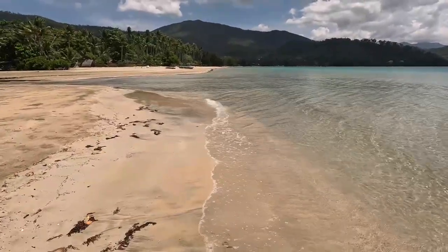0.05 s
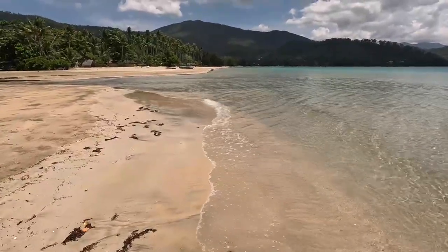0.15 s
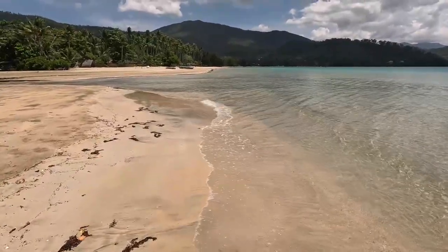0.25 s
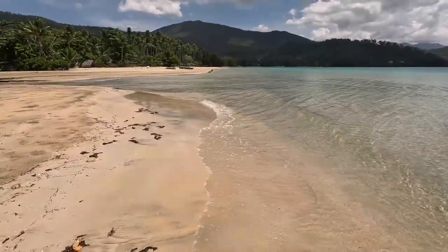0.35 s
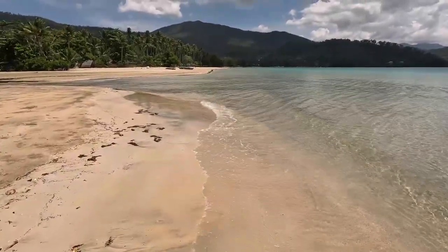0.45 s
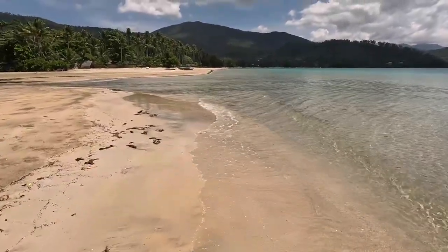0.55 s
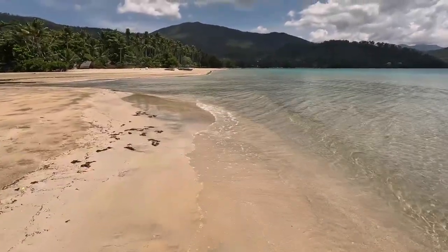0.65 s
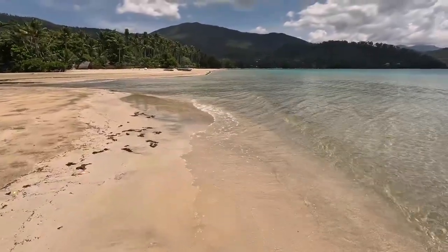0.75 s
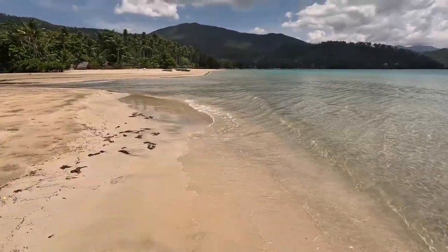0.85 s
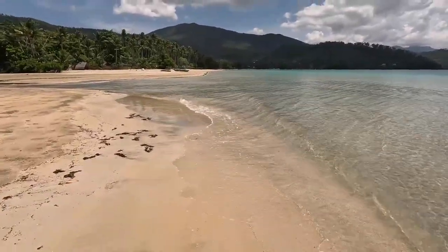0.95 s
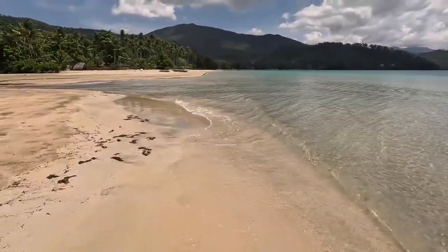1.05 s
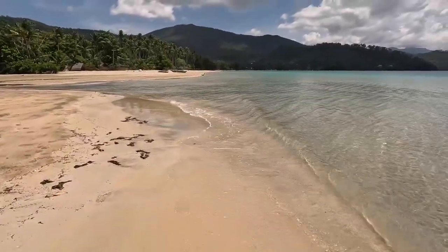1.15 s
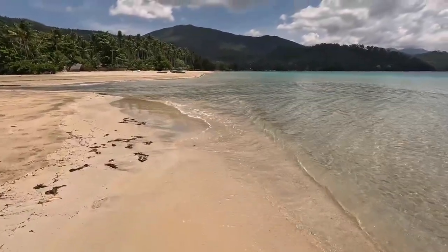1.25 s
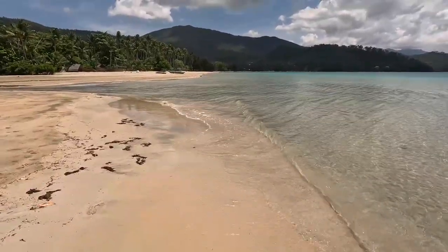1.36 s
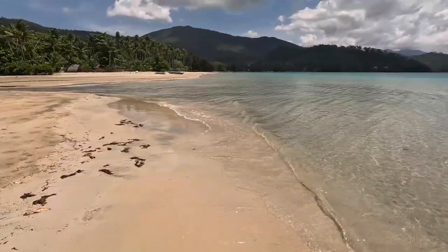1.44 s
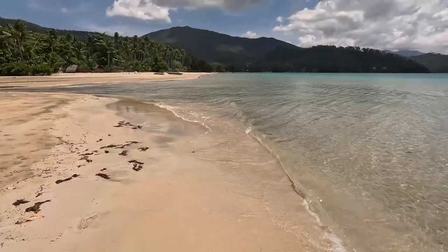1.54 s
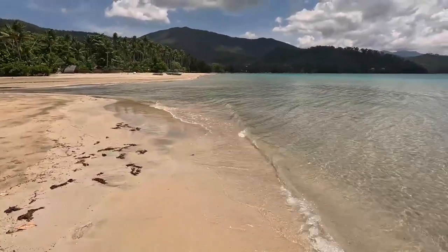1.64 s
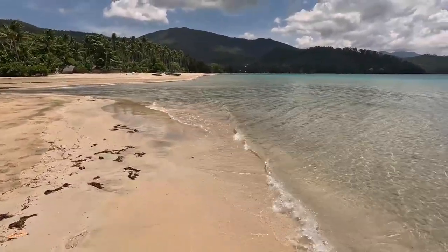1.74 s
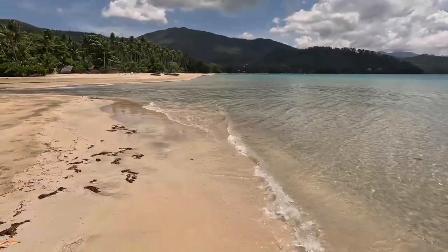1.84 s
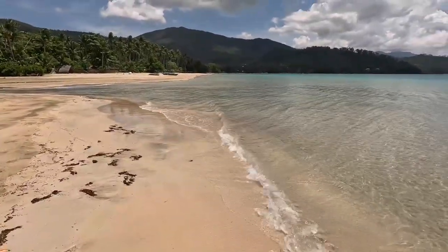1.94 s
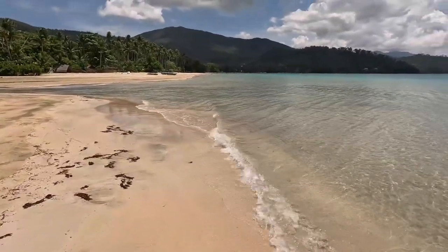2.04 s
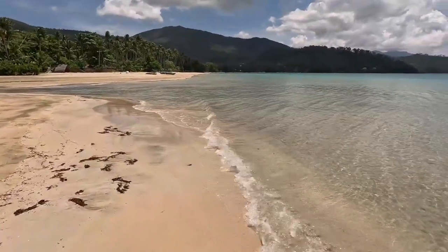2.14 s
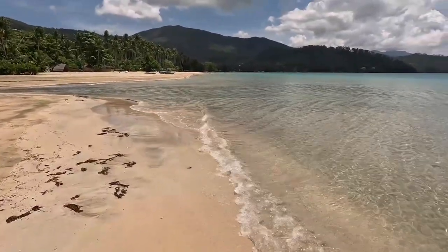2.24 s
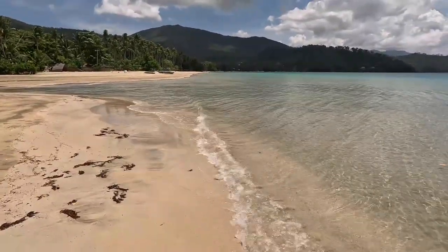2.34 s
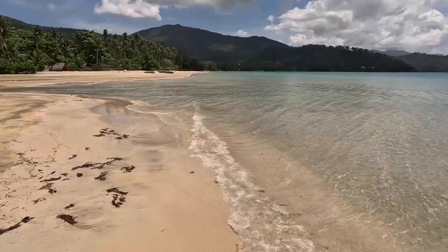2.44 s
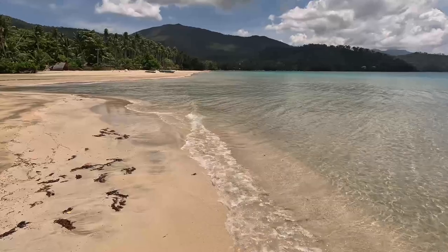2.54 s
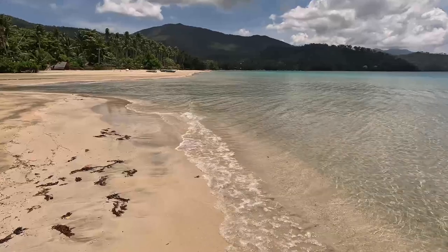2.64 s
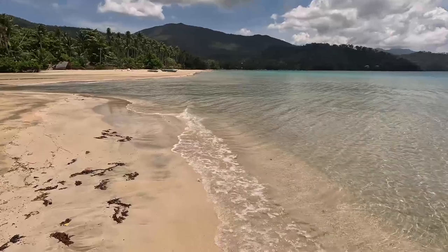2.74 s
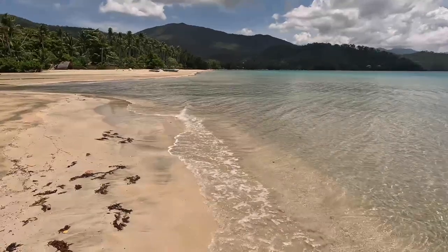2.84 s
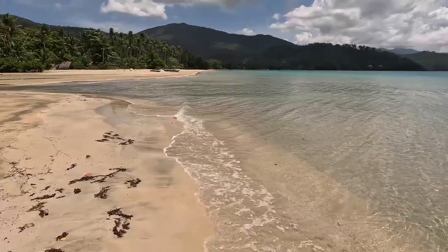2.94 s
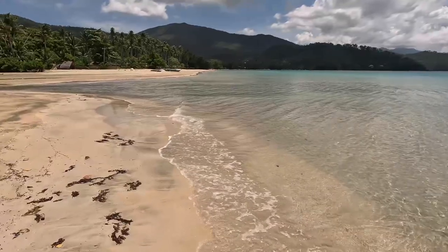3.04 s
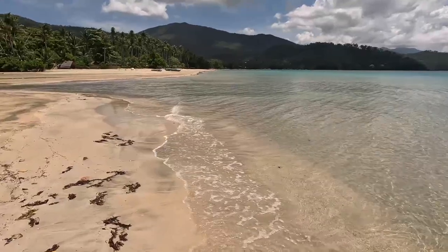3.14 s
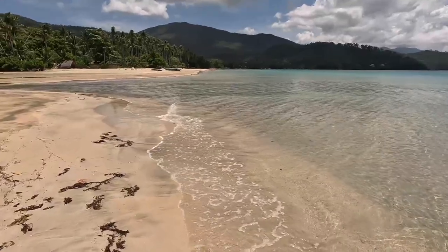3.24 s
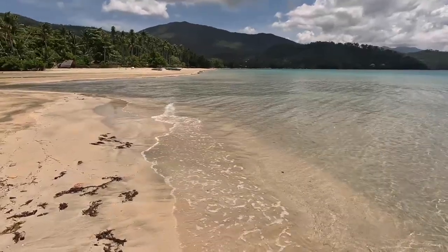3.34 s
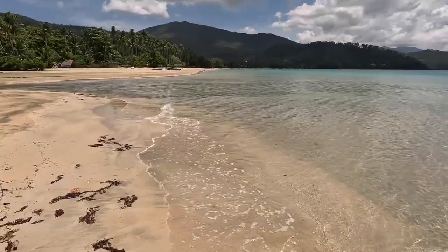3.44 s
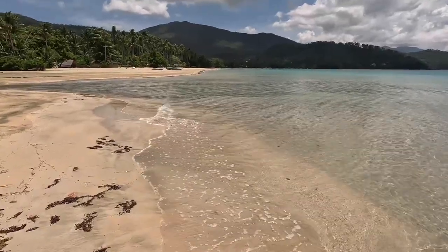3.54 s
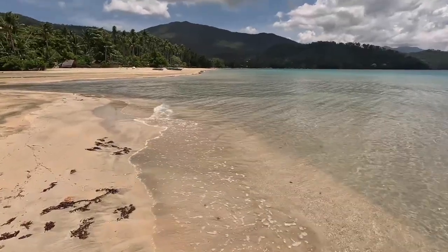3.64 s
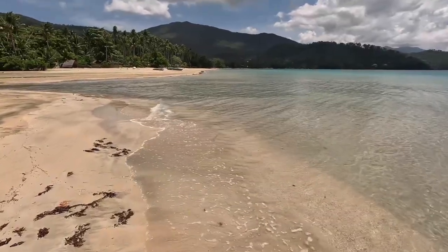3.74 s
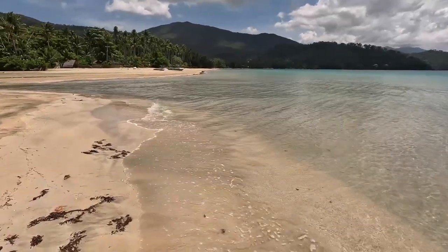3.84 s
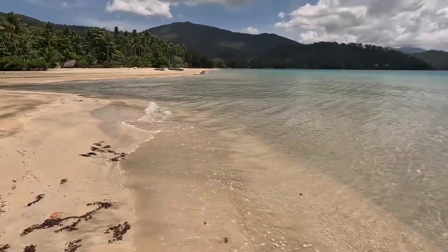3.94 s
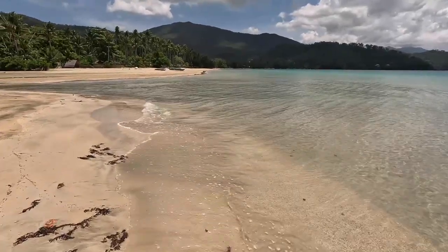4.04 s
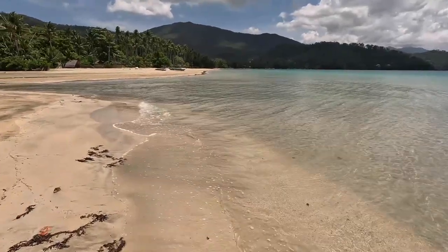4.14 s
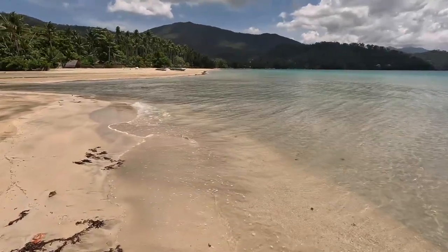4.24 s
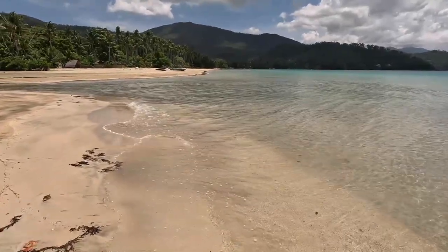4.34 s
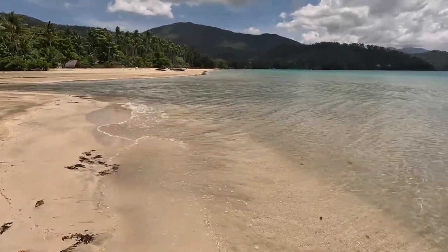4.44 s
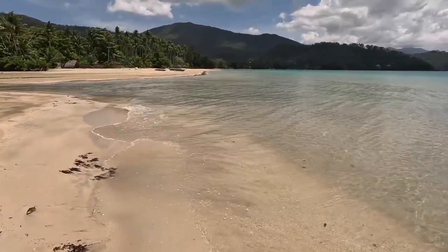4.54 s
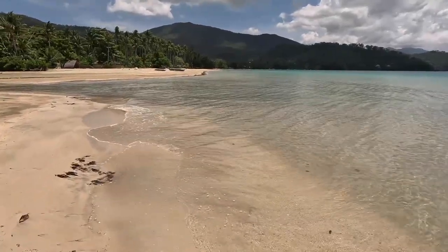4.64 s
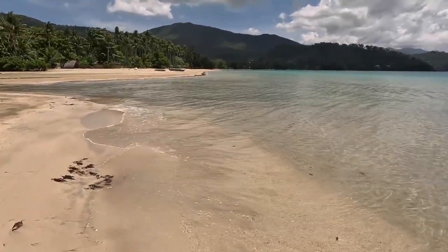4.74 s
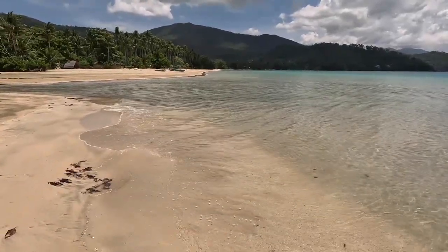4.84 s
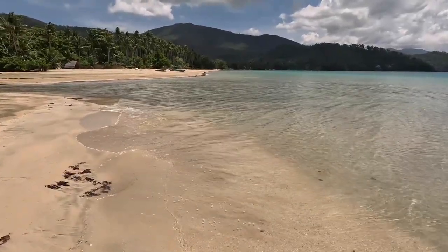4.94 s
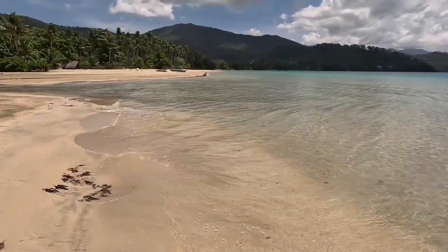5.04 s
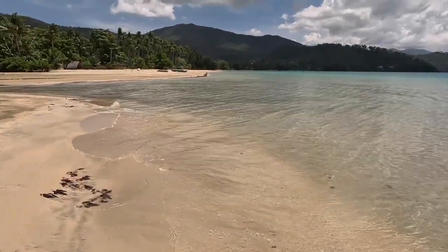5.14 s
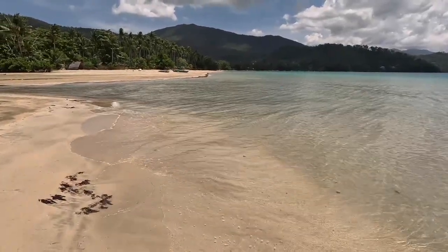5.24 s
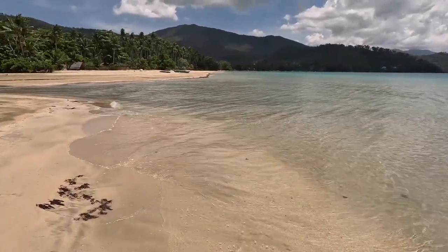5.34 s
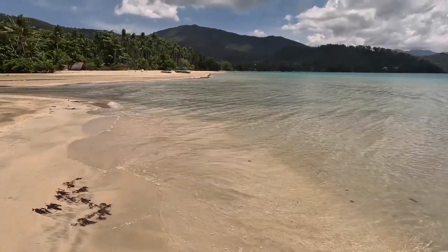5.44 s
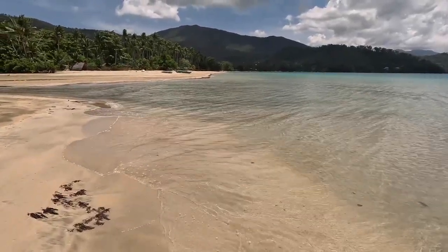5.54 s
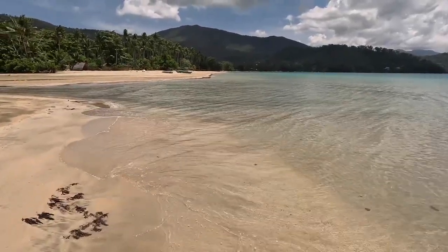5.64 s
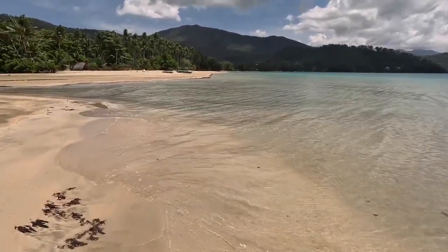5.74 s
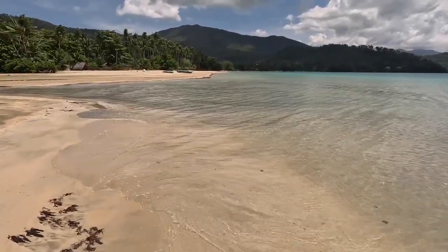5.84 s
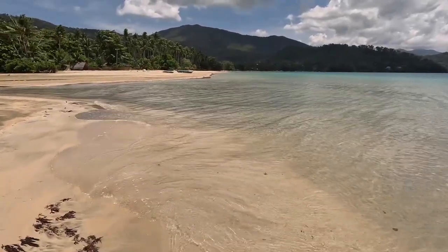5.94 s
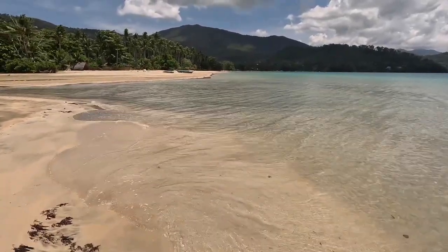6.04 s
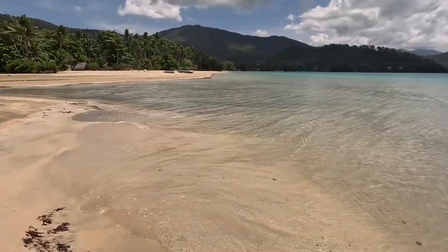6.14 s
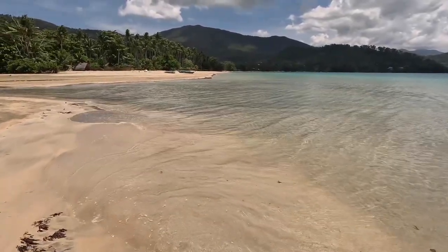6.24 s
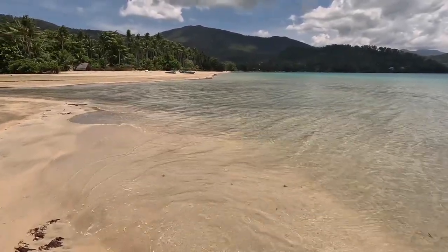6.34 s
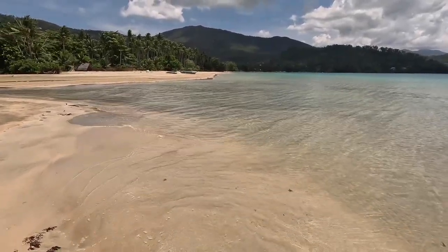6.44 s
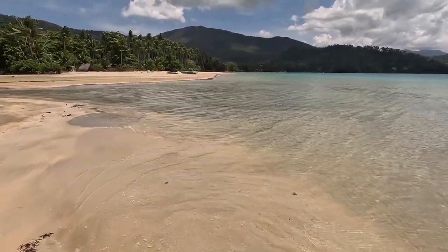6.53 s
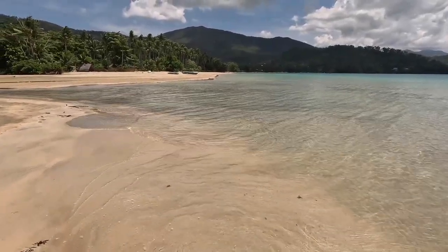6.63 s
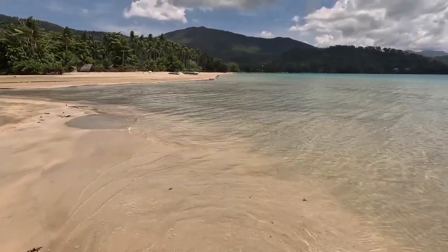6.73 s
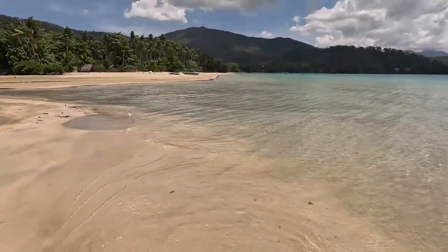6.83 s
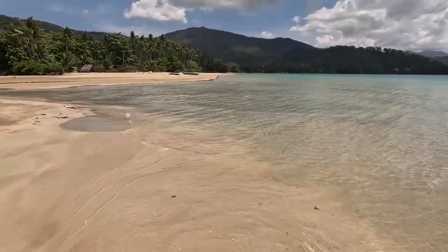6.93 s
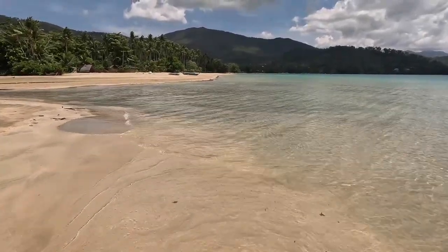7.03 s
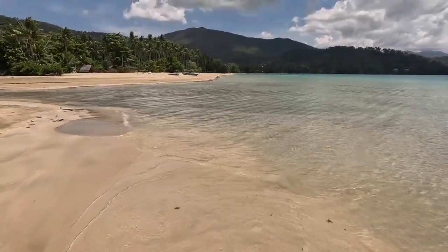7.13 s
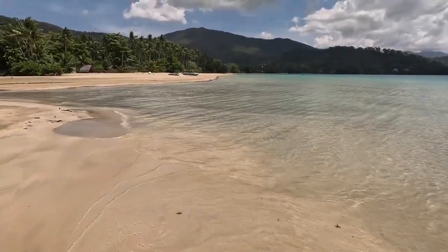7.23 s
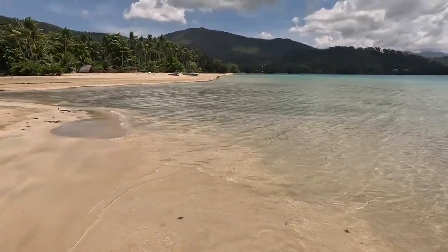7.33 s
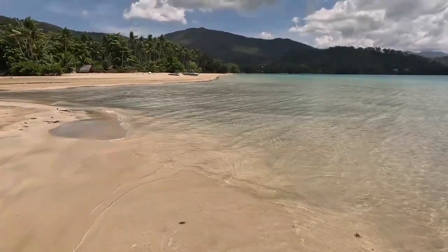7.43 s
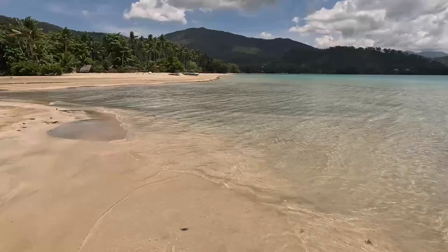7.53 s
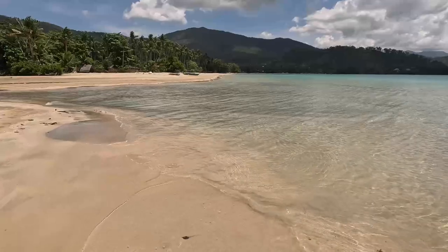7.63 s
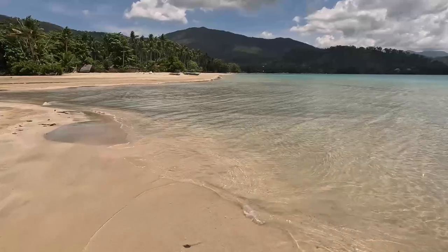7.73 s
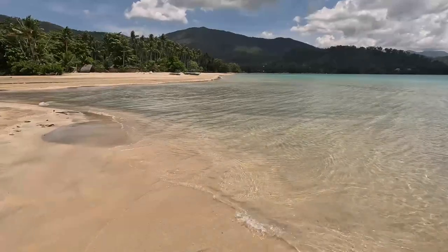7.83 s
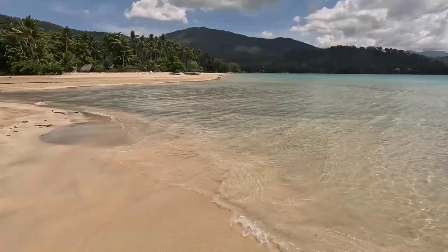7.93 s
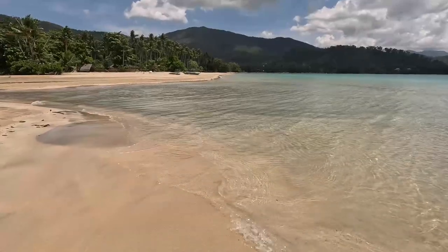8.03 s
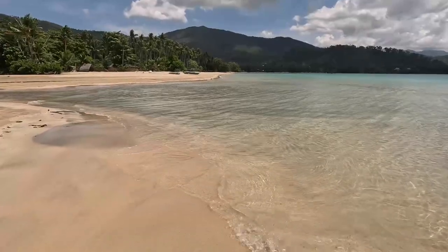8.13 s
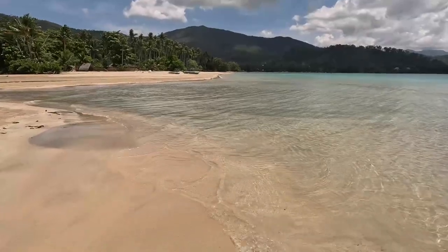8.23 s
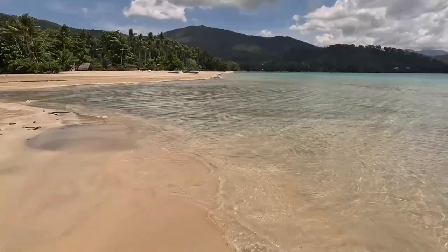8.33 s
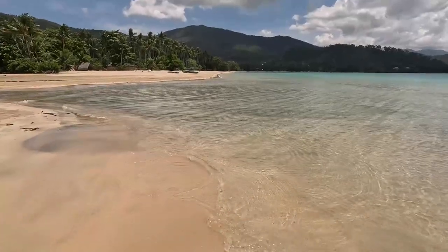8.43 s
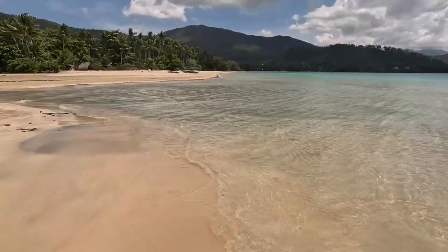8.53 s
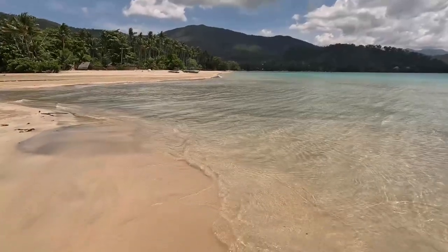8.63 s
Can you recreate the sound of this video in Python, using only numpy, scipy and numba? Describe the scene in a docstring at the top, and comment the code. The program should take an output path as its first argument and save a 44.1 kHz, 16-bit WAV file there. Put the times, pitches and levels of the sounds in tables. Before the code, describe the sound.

A gentle wavelet breaks nearby with gurgling plops and foamy fizz, wind rumbling beneath, before quieter laps and small drips as the breeze fades.

```python
"""Wind rumble and soft small waves come first; then a wavelet curls over close by on a sandy beach.
It fizzes as foam and drains away with little laps; weaker surges follow as the breeze dies down.
The water is made of clouds of ringing bubbles, with single plops, drops, slaps and gurgles.
Part of it also bounces off the wet sand. Wind and a thin hiss are shaped random noise."""
import sys
import numpy as np
from scipy import signal
from scipy.fft import rfft, irfft, next_fast_len
from scipy.io import wavfile
from scipy.ndimage import uniform_filter1d
from numba import njit

SR = 44100
rng = np.random.default_rng(int(sys.argv[2]) if len(sys.argv) > 2 else 0)


def int16_out(signal):
    """Quantize to a 16-bit WAV file."""
    q = np.round(np.clip(np.atleast_2d(signal).T, -1, 1) * 32767)
    wavfile.write(sys.argv[1], SR, q.astype(np.int16))


N = 382788
TIME = np.arange(N) / SR
STEPS = np.arange(N // 100 + 2) * 100 / SR  # a coarser clock for slow changes, in s

# swells of the water sound (breaks, surges, foam bursts and backwash):
# [peak t/s, build-up/s, draining/s, churn level/dB, spray level/dB, fizz level/dB]
SWELLS = [(0.02, 0.12, 0.12, -51.5, -55.5, -70), (0.43, 0.35, 0.49, -43, -50.5, -68),
          (0.63, 0.018, 0.098, -39.5, -49, -78), (0.81, 0.11, 1.2, -40, -46.5, -68),
          (1.18, .1, 0.094, -41, -48.5, -75), (1.35, 0.11, 0.62, -41, -40, -58),
          (1.55, 0.029, 0.026, -28.5, -53.5, -71), (1.605, 0.088, 0.78, -30.5, -35.5, -55),
          (1.61, .03, 0.043, -28.5, -34.3, -60), (1.82, 0.084, 0.12, -30, -39, -62),
          (1.95, .03, 0.15, -31.5, -38.5, -65), (2.29, 0.085, 0.16, -35.5, -38, -67),
          (2.5, .06, 0.25, -43, -47, -79), (2.71, 0.044, .06, -45.5, -51.5, -77),
          (3.1, 0.053, 0.06, -47, -51, -62), (3.39, 0.096, 0.07, -49, -58, -67),
          (3.905, 0.031, 0.036, -64, -50, -74), (4.0, 5.5, 0.64, -52, -66, -74),
          (4.38, 0.18, 0.11, -49.5, -54, -69), (4.505, 0.14, 0.087, -45.5, -53, -70),
          (4.63, .07, 0.095, -51, -61, -74), (5.25, 0.17, 0.2, -48.5, -61, -80),
          (5.64, 0.22, 0.17, -49.5, -63, -82), (7.0, 0.31, 1.1, -58.5, -60, -91),
          (8.06, 0.25, 0.34, -55, -51.5, -68), (8.11, 0.056, 0.028, -45.5, -65, -65),
          (8.28, 0.061, 0.12, -54, -56, -74), (8.66, 0.11, .3, -56.5, -52.5, -66)]
# the far shoreline, always there: [churn level/dB, spray level/dB, fizz level/dB]
SHORE_LEVELS = (-54.5, -60, -74.5)
# the near crest curling over: [t/s, build-up/s, draining/s, level of its big air pockets/dB]
CURLS = [(1.25, 0.29, 0.26, -34.5), (1.69, 0.13, 0.16, -28.5)]
# single air pockets closing in the water: [t/s, pitch f/Hz, tone peak level/dB, length/s, pitch climb/share]
PLOPS = [(0.62, 800, -28, 0.004, 0.21), (.723, 720, -31, 0.0047, 0.19), (0.803, 1346, -28.5, .007, 0.089),
         (0.92, 217, -22, 0.011, .1), (1.2646, 1160, -19.5, 0.003, -0.2), (1.2825, 557, -21, 0.015, -0.23),
         (1.407, 606, -23.5, 0.006, 0.14), (1.5572, 625, -20, 0.0091, -0.13),
         (1.5995, 1290, -18.5, 0.0042, 0.15), (1.622, 183, -16.5, .016, -0.023),
         (1.6625, 420, -17.5, 0.0085, 0.28), (1.6969, 460, -16, 0.0039, 0.21),
         (1.7505, 740, -19, 0.0043, .1), (1.7545, 335, -17, 0.0082, 0.1),
         (1.8597, 850, -18.5, 0.0047, -0.17), (1.97, 254, -18, 0.0087, -0.047),
         (2.276, 800, -19.5, .004, 0.17), (2.3186, 250, -17.5, 0.0052, -0.016),
         (2.785, 756, -34, 0.011, 0.14), (2.982, 672, -33, 0.011, 0.24), (3.388, 700, -35, 0.011, 0.19),
         (3.4921, 173.7, -33.5, 0.024, 0.32), (3.493, 560, -32.5, 0.0055, 0.15),
         (3.5096, 565, -36, 0.0095, 0.38), (3.822, 640, -45, 0.0106, -.1), (3.968, 1540, -42, 0.01, 0.17),
         (4.2656, 750, -36, 0.0034, .1), (4.3346, 720, -34.5, 0.0072, 0.14), (4.359, 750, -39, 0.0076, .1),
         (4.4678, 267, -30, 0.0086, 0.27), (4.4915, 726, -34, .003, .1), (4.4975, 726, -31.5, 0.009, .05),
         (4.6926, 1100, -38, 0.0099, 0.16), (5.0467, 760, -35, 0.0051, .1), (5.062, 950, -45, 0.0054, .25),
         (5.153, 1600, -38, 0.0039, -0.12), (5.1547, 780, -34, 0.008, -0.021),
         (5.1726, 660, -33, 0.0059, -0.27), (5.2476, 290, -30.5, 0.008, 0.021),
         (5.2749, 1670, -39.5, .007, -0.038), (5.298, 750, -33, 0.013, 0.53), (5.321, 1495, -41.5, .01, .2),
         (5.3939, 780, -39.5, 0.0038, .1), (5.588, 610, -40, .02, 0.37), (5.6371, 685, -40, .012, 0.11),
         (5.634, 222, -34.5, 0.013, -0.18), (5.699, 730, -38, 0.0143, 0.43),
         (5.8995, 746, -40.5, 0.0059, 0.14), (5.9331, 754, -44, .015, 0.23), (6.4352, 375, -37, 0.0052, .2),
         (6.973, 670, -38, 0.0082, 0.069), (7.113, 1450, -42, .01, 0.19),
         (7.2739, 600, -31.5, 0.0068, -0.037), (7.845, 1370, -40, .007, 0.062),
         (7.9221, 257, -35, 0.0089, .1), (7.933, 1530, -40, .005, 0.15), (7.9755, 830, -30, 0.004, -0.26),
         (7.997, 330, -38, .009, .1), (8.0105, 706, -29, 0.0083, 0.0041), (8.0216, 930, -29, 0.0041, .1),
         (8.0336, 750, -32, 0.0043, -0.018), (8.0505, 850, -29.5, 0.0075, 0.3),
         (8.07, 253, -36, 0.0079, 0.025), (8.0757, 730, -31.5, 0.0032, 0.057),
         (8.088, 1500, -33, 0.0043, 0.16), (8.0954, 890, -21.5, 0.00323, 0.053),
         (8.103, 970, -30, 0.0075, 0.13), (8.1155, 2950, -36, .003, 0.045),
         (8.1161, 2300, -37, 0.0058, 0.17), (8.1205, 1030, -30, 0.0043, .1),
         (8.3059, 1780, -36, 0.0058, 0.22), (8.3343, 940, -32, 0.0046, 0.047),
         (8.336, 340, -38, 0.01, 0.17)]
# drops landing and small bubbles bursting nearby: [t/s, pitch f/Hz, tone peak level/dB, length/s]
DROPS = [(1.013, 9500, -47, .0006), (1.026, 9000, -47, .0006), (1.2936, 2340, -17.5, 0.00057),
         (1.2938, 4700, -25, .0006), (1.3637, 1800, -17.5, 0.0013), (1.3629, 4530, -23, 0.0004),
         (2.229, 3280, -24.5, .003), (3.371, 2950, -41, .002), (3.382, 4350, -41, 0.0014),
         (3.396, 2550, -38, .0025), (3.458, 3590, -44, .0015), (3.704, 4400, -44, 0.0011),
         (3.712, 2800, -38, .0016), (3.719, 4370, -40, 0.0011), (3.928, 3810, -41, 0.001),
         (3.91, 3450, -34.5, 0.0015), (3.923, 2980, -43, 0.00196), (4.309, 4060, -31, 0.00044),
         (4.571, 5400, -43, 0.0012), (7.03, 6080, -42, .0003), (7.1374, 6000, -38.5, .0007),
         (7.1575, 7000, -48, .0002), (7.5102, 4440, -36.5, 0.00025), (7.593, 7450, -38, 0.00049),
         (7.622, 4600, -25.5, 0.00016), (7.813, 3830, -36, 0.00043), (7.8819, 3850, -30.5, 0.001),
         (8.074, 6200, -38, .0003), (8.1158, 5600, -36, 0.0013), (8.2016, 4960, -23, 0.00053),
         (8.21, 4130, -28, 0.00072), (8.228, 5310, -38, .0008), (8.2626, 4660, -38, .0005),
         (8.451, 2980, -39, .002), (8.602, 4310, -40, 0.00069), (8.617, 5100, -35, 0.00047)]
# the lip of a crest slapping water or sand: [t/s, level/dB, decay/s]
SLAPS = [(0.619, -40, 0.012), (0.795, -36, 0.047), (1.292, -26, 0.0025), (1.3624, -26.5, 0.008),
         (1.588, -33, .03), (1.75, -34, .02), (3.384, -57, .016), (3.703, -40.5, 0.011),
         (4.309, -42, 0.0044), (5.041, -48, .006), (5.151, -41, 0.007), (6.733, -48.5, 0.01),
         (8.112, -39, 0.0097), (8.256, -41.5, .014)]
# ripples folding shut: [t/s, length/s, first f/Hz, last f/Hz, rms level/dB]
GURGLES = [(0.819, .07, 340, 420, -42), (1.104, 0.11, 304, 424, -37), (1.17, .09, 630, 1010, -38.5),
           (1.602, 0.19, 328, 423, -43), (2.2, 0.19, 810, 830, -35), (3.307, 0.061, 282, 220, -45),
           (4.65, 0.037, 497, 1160, -46), (5.056, 0.11, 248, 420, -47), (5.186, 0.052, 336, 300, -48),
           (5.527, 0.11, 204, 270, -50), (5.638, 0.054, 1050, 1600, -58), (6.675, .07, 354, 560, -51),
           (6.732, .06, 670, 960, -48.5), (7.83, 0.24, 263, 307, -49), (7.96, 0.14, 840, 1000, -44.5),
           (8.038, 0.095, 1300, 1650, -48), (8.241, .17, 960, 900, -48.5)]
# separate droplets of the last wavelet: [t/s, level/dB]
PATTER = [(7.4, -100), (7.75, -67), (7.95, -60), (8.1, -60.5), (8.4, -61.5), (8.68, -65.5)]
# delay of the bounce off the wet sand, as the breaking front moves: [t/s, lag/ms]
SAND_LAG = [(0, 1.36), (.7, 1.4), (1.2, 1.75), (1.6, 1.65), (1.9, 1.2), (2.3, 1.22), (3.0, 1.3),
            (3.7, 1.39), (5.3, 1.3), (7.4, 1.4), (8.0, 1.1), (8.68, 1.1)]
# how wide the sound is, opening once the breeze has dropped: [t/s, side against centre level/dB]
WIDTH = [(0, -81), (6.4, -51), (7, -25), (7.7, -20.5), (8.68, -15)]
# the breeze dying down: [t/s, wind level/dB]
BREEZE = [(0, -39.5), (0.35, -33.5), (2.1, -33.5), (2.28, -37.5), (2.7, -36), (3.1, -37), (3.6, -44),
          (4.4, -46.5), (5.5, -51.5), (7, -54.5), (8.68, -66)]
# gusts on top of the breeze: [t/s, half length/s, wind level/dB]
GUSTS = [(0.187, 0.021, -31), (0.362, 0.029, -27), (0.44, 0.015, -25.5), (0.559, 0.054, -26.5),
         (0.72, 0.027, -30), (0.806, 0.02, -28), (0.945, 0.026, -30), (1.497, 0.018, -25),
         (1.608, 0.051, -27), (1.777, 0.03, -28), (1.996, 0.038, -24.5), (2.166, 0.034, -32.5),
         (2.447, .025, -28), (2.591, 0.048, -23.5), (2.802, 0.076, -36), (3.857, 0.024, -38.5),
         (4.082, 0.03, -38), (4.22, 0.033, -38), (4.333, .06, -41), (4.987, 0.13, -45.5),
         (6.046, 0.12, -44), (6.504, 0.15, -49), (6.987, 0.06, -47), (7.58, .03, -50), (8.226, .04, -53)]
# swelling and sinking of the thin hiss: [t/s, level/dB in the left ear]
HISS = [(0, -74), (.4, -75), (.55, -88), (3.1, -88), (3.4, -73.5), (4.5, -74), (4.8, -77.5), (7.3, -79.5),
        (8.1, -75), (8.68, -77)]
# tone colour of each layer, as a curve over pitch: [f/Hz, level/dB]
CHURN_COLOUR = [(60, -8), (160, -0.5), (260, 5), (350, 1), (470, -4.5), (750, 2), (1120, -3.2),
                (1420, -8.5), (2100, -15), (3000, -28), (6000, -57), (12000, -80)]
SPRAY_COLOUR = [(600, -8), (1100, -3), (1400, 5), (1700, 1.5), (2000, 1), (2400, -1), (3100, -2),
                (3800, -5.5), (4700, -12), (5700, -16.5), (7000, -25), (10000, -47)]
FIZZ_COLOUR = [(3000, 11), (5500, 3), (7500, -1.5), (9000, -1), (10500, -6), (12000, -13.5), (13200, -18),
               (14500, -39)]
CURL_COLOUR = [(50, -18), (130, -0.5), (230, 2), (450, 0.5), (620, -2.5), (820, -7), (1050, -4),
               (1600, -15), (4000, -66.5), (10000, -80)]
SLAP_COLOUR = [(400, -6), (900, 4), (1800, 14.5), (3000, -4.5), (5000, -12.5), (8000, -17), (12000, -33),
               (15000, -57)]
PATTER_COLOUR = [(1500, 17.5), (3000, 1), (5400, -0.5), (7700, -12), (9200, -15), (10500, -7.5),
                 (12500, -19), (14000, -23)]
WIND_COLOUR = [(8, -16), (22, -1.5), (40, -4), (62, -6), (90, -14), (140, -17), (220, -25.5), (400, -34),
               (1000, -74), (4000, -120)]
BUFFET_COLOUR = [(25, -2), (45, -11.5), (62, 2), (88, -5), (120, -6.5), (165, -8.5), (220, -15.5),
                 (300, -30), (500, -32.5), (1500, -58), (6000, -110)]
HISS_COLOUR = [(7000, -22), (10000, -8), (11500, -2), (12700, 0), (13500, -6), (14300, -17), (15200, -36)]

FOAM_LINGER = 1.27  # foam takes this many times longer to drain than the water
DRAIN_SHAPE = 1.29  # above 1 a swell lingers at its peak and then falls faster
SURGE_WANDER_DB = .6
LAP_DB = -9.5  # the many lesser air pockets, against the churning
DROP_RISE = 0.038  # pitch climb of a drop's bubble, as a share
DROP_SPLASH_S = .004
SAND_SHARE, SAND_EDGE_HZ = 0.22, 1140  # strength of the bounce; it is duller above this pitch
LAG_WANDER = .035  # random drift of the bounce delay, as a share
SIDE_EDGE_HZ = 4500  # the widening copy of the wash is duller above this
RUMBLE_SHARE_DB, RUMBLE_WANDER_DB = -0.5, 1.5
BUFFET_SHARE_DB, BUFFET_WANDER_DB = 1.76, 2.0  # the share holds at the strongest gust
BUFFET_GROWTH = 0.44  # extra dB of buffeting per dB of wind
TOP_HZ = 14800  # treble above this is cut


def curl():
    """The near crest folds over and traps big air pockets: a low gurgle."""
    sizes, band = (90, 2200), (350, 550)
    folding_db = together([amp(db) * surge(s, build_s, drain_s) for s, build_s, drain_s, db in CURLS])
    cloud = bubbles(sizes, per_s=1500, cycles=13, spread_db=1.5, rise=0.2, blur=0.6)
    return colour(cloud, CURL_COLOUR, band) * amp(folding_db)


def surge(s, build_s, drain_s):
    """The water sound builds up to its peak, then drains away."""
    pace_s = np.where(STEPS < s, build_s, drain_s)
    return np.exp(-(np.abs(STEPS - s) / pace_s) ** DRAIN_SHAPE)


def shore():
    """Levels in dB of churning, spray and fizz: each swell drives all three, and its foam lingers."""
    churn_gains, spray_gains, fizz_gains = layers = [[amp(db)] for db in SHORE_LEVELS]
    for s, build_s, drain_s, churn_db, spray_db, fizz_db in SWELLS:
        water = surge(s, build_s, drain_s)
        foam = surge(s, build_s, drain_s * FOAM_LINGER)
        churn_gains.append(amp(churn_db) * water)
        spray_gains.append(amp(spray_db) * water)
        fizz_gains.append(amp(fizz_db) * foam)
    uneven_db = SURGE_WANDER_DB * walk(14)  # the front never breaks evenly along its length
    return [together(layer) + uneven_db for layer in layers]


def churn(db):
    """Middle-sized bubbles ring where the water tumbles along the shore, in uneven surges."""
    sizes, band = (130, 3500), (600, 1800)
    cloud = bubbles(sizes, per_s=1700, cycles=17, spread_db=2.6, rise=.15, blur=.6)
    return colour(off_sand(cloud), CHURN_COLOUR, band) * amp(db + 0.73 * walk(16))


def laps(db):
    """Lesser air pockets close at random, as loud as the water is lively."""
    sizes, band = (180, 1800), (600, 1800)
    cloud = bubbles(sizes, per_s=45, cycles=20, spread_db=1.8, rise=.25, blur=0)
    return colour(off_sand(cloud), CHURN_COLOUR, band) * amp(db + LAP_DB)


def spray(db):
    """Droplets and small bubbles are thrown up by the front of the water."""
    sizes, band = (1000, 9000), (2300, 5000)
    cloud = bubbles(sizes, per_s=4000, cycles=22, spread_db=2.8, rise=.1, blur=.7)
    return colour(off_sand(cloud), SPRAY_COLOUR, band) * amp(db + 0.88 * walk(25))


def fizz(db):
    """Foam bursts on the sand: a crowd of tiny, high bubbles."""
    sizes, band = (4000, 15000), (7000, 10500)
    cloud = bubbles(sizes, per_s=3000, cycles=10, spread_db=1.0, rise=.05, blur=1.0)
    return colour(cloud, FIZZ_COLOUR, band) * amp(db + 0.58 * walk(30))


def patter():
    """The last wavelet breaks so thinly and so close that its droplets stand apart."""
    sizes, band = (1500, 13000), (4000, 9000)
    db, = curves(PATTER)
    cloud = bubbles(sizes, per_s=900, cycles=14, spread_db=2.4, rise=.08, blur=0)
    return colour(cloud, PATTER_COLOUR, band) * amp(db)


def plops():
    """Single air pockets close in a lap of water and ring, each with a longer splash."""
    return blips(PLOPS, splash=0.14, splash_s=0.022, breadth=0.58)


def drops():
    """Drops land and small bubbles burst: short, high rings with a quick splash."""
    table = [(*drop, DROP_RISE) for drop in DROPS]
    return blips(table, splash=0.2, splash_s=DROP_SPLASH_S, breadth=0.29)


def blips(table, splash, splash_s, breadth):
    """Each cavity swells, rings with a gliding pitch and dies; a little splash around that pitch trails it."""
    out = np.zeros(N)
    size = SR // 8
    noises = rng.standard_normal((len(table), size))
    t = np.arange(size) / SR
    for (s, hz, db, length, rise), noise in zip(table, noises):
        swell = length / 2.45  # time from silence to the peak, in s
        age = t / swell
        pitch = hz * (1 + rise * np.tanh((age - 1.5) / 3))
        tone = age * np.exp(1 - age) * np.sin(2 * np.pi * np.cumsum(pitch) / SR)
        edges = [hz / (1 + breadth), min(hz * (1 + breadth), SR / 2 - 1000)]
        near_pitch = signal.butter(2, edges, "band", fs=SR, output="sos")
        wet = unit(signal.sosfilt(near_pitch, noise))
        trail = splash * wet * (1 - np.exp(-age)) * np.exp(-t / splash_s)
        sound = amp(db) * (tone + trail)
        start = int((s - swell) * SR)  # so that the swell peaks at the listed time
        out[start:start + size] += sound[:N - start]
    return out


def gurgles():
    """As a ripple folds, its air pocket changes size: bubble after bubble sounds along a sliding pitch."""
    out = np.zeros(N)
    for s, length, first_hz, last_hz, db in GURGLES:
        u = rng.random((32, 3))
        count = int(np.clip(length * 190, 4, len(u)))  # about 190 bubbles a second
        along = (np.arange(count) + .2 + .6 * u[:count, 0]) / count  # 0 at the start, 1 at the end
        slide_hz = first_hz * (last_hz / first_hz) ** along
        hz = slide_hz * (1 + 0.12 * (u[:count, 1] - .5))
        size = np.sqrt(np.sin(np.pi * along)) * (.5 + u[:count, 2])
        start = ((s + along * length) * SR).astype(np.int64)
        chain = ring(np.zeros(N), start, hz, np.full(count, 14.), size, 0.1)
        out += chain * amp(db) * np.sqrt(length * SR / np.sum(chain ** 2))
    return out


def slaps():
    """Each slap throws up a short, bright burst of spray: noise that starts at once and dies away."""
    blow = np.zeros(N)
    for s, db, decay_s in SLAPS:
        pace_s = np.where(TIME < s, .0006, decay_s)
        blow += amp(db) * np.exp(-np.abs(TIME - s) / pace_s)
    return blow * colour(rng.standard_normal(N), SLAP_COLOUR, (500, 8000))


def off_sand(x):
    """The wet sand returns a duller copy just after the direct sound; the hollow tone shifts with the delay."""
    lag_ms = curves(SAND_LAG)[0] * (1 + LAG_WANDER * walk(2.7))
    bounce = signal.sosfilt(signal.butter(1, SAND_EDGE_HZ, fs=SR, output="sos"), x)
    return x + SAND_SHARE * np.interp(TIME - lag_ms / 1000, TIME, bounce, left=0)


def wind():
    """Eddies rumble on the microphone; strong gusts add a faster, higher buffeting."""
    band = (20, 130)
    breeze = amp(np.interp(STEPS, *np.transpose(BREEZE)))
    gusts = [amp(gust_db) * bell(s, half_s) for s, half_s, gust_db in GUSTS]
    db = together([breeze] + gusts)
    rumble_db = db + RUMBLE_SHARE_DB + RUMBLE_WANDER_DB * walk(12)
    rumble = colour(rng.standard_normal(N), WIND_COLOUR, band) * amp(rumble_db)
    strength_db = db + BUFFET_SHARE_DB + BUFFET_GROWTH * (db - db.max())
    buffet_db = strength_db + BUFFET_WANDER_DB * walk(30)
    buffet = colour(rng.standard_normal(N), BUFFET_COLOUR, band) * amp(buffet_db)
    return rumble + buffet


def bell(s, half_s):
    """A smooth rise and fall around the time s."""
    return np.exp(-.5 * ((STEPS - s) / half_s) ** 2)


def hiss():
    """A faint thin hiss of high noise, different in each ear and stronger on the left."""
    band = (11800, 13500)
    db, = curves(HISS)
    ears = [amp(db + ear_db) * colour(rng.standard_normal(N), HISS_COLOUR, band) for ear_db in (0, -6)]
    return np.array(ears)


def bubbles(band, per_s, cycles, spread_db, rise, blur):
    """A cloud of bubbles, many faint and a few strong, over the blur of countless distant ones."""
    u = rng.random((int(per_s * N / SR), 4))
    start = (u[:, 0] * N).astype(np.int64)
    hz = band[0] * (band[1] / band[0]) ** u[:, 1]
    strength_db = spread_db * np.minimum(-np.log(1 - u[:, 2]), 4.5)
    # small bubbles die sooner and start harder, so the cloud is even in frequency
    size = hz * amp(strength_db)
    cloud = ring(np.zeros(N), start, hz, cycles * (.5 + u[:, 3]), size, float(rise))
    distant = rng.standard_normal(N) * np.sqrt(SR / 2 / (band[1] - band[0]))
    return unit(cloud) + blur * distant


@njit
def ring(out, start, hz, cycles, size, rise):
    """Sum of damped sines whose pitch climbs as each bubble nears the surface."""
    y = out.copy()
    for k in range(len(start)):
        life = cycles[k] * SR / hz[k]  # in samples
        step = 2 * np.pi * hz[k] / SR
        z = size[k] + 0j
        p = np.exp(1j * step - 5 / life)  # one sample's turn and fade
        glide = np.exp(1j * step * rise / life)  # each turn is a little bigger than the last
        for i in range(start[k], min(start[k] + int(life), len(y))):
            z *= p
            p *= glide
            y[i] += z.imag
    return y


def colour(x, points, band):
    """Shape x by (Hz, dB) points, with rms 1 inside the band (Hz, Hz)."""
    hz, db = np.transpose(points)
    size = next_fast_len(N)
    f = np.fft.rfftfreq(size, 1 / SR)
    shaped = rfft(x, size) * amp(np.interp(np.log(f + 1), np.log(hz), db))
    inside = shaped[(f > band[0]) & (f < band[1])]
    return irfft(shaped, size)[:N] * size / np.sqrt(2 * np.sum(np.abs(inside) ** 2))


def walk(rate):
    """Smooth random wander with spread 1, turning about rate times a second."""
    k = max(int(SR / rate), 2)
    held = np.repeat(rng.standard_normal(N // k + 2), k)[:N]
    return unit(uniform_filter1d(uniform_filter1d(held, k), k // 2))


def together(gains):
    """Level in dB, per sample, of unrelated sounds heard at once: their powers add."""
    power = sum(g ** 2 for g in gains)
    return smooth(10 * np.log10(power + 1e-18))


def smooth(values):
    """Slow values, one per step, joined into one per sample."""
    return np.interp(TIME, STEPS, values)


def curves(table):
    """The columns of a table, after its times, as one value per sample."""
    s, *columns = np.transpose(table)
    return [np.interp(TIME, s, c) for c in columns]


def unit(x):
    """Scale to rms 1."""
    return x / np.sqrt(np.mean(x ** 2))


def amp(db):
    """Decibels to gain."""
    return 10 ** (np.asarray(db) / 20)


def scene():
    """Water and wind sit in the centre; late on the wash widens and the nearest drops fall to the left."""
    churn_db, spray_db, fizz_db = shore()
    width_db, = curves(WIDTH)
    wash = churn(churn_db) + laps(churn_db) + spray(spray_db) + fizz(fizz_db) + curl() + patter()
    pockets = plops()
    near_drops = drops()
    mid = wash + pockets + near_drops + gurgles() + slaps() + wind()
    # a duller copy of the wash, 6 ms late and opposite in the two ears, widens the image
    dull_wash = signal.sosfilt(signal.butter(1, SIDE_EDGE_HZ, fs=SR, output="sos"), wash)
    late_wash = np.interp(TIME - .006, TIME, dull_wash, left=0)
    side = amp(width_db) * (late_wash + amp(5) * near_drops)
    return mid + np.array([side, -side]) + hiss()


def record(dry):
    """The camera cuts the highest treble with a steep filter."""
    return signal.sosfilt(signal.ellip(8, .2, 70, TOP_HZ, fs=SR, output="sos"), dry)


dry = scene()
out = record(dry)
int16_out(out)
```